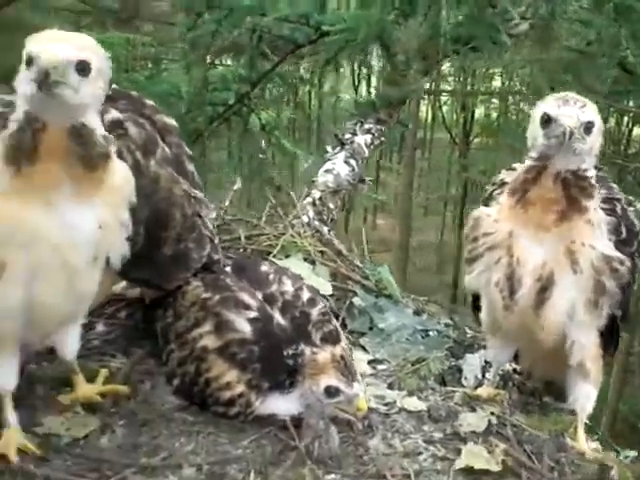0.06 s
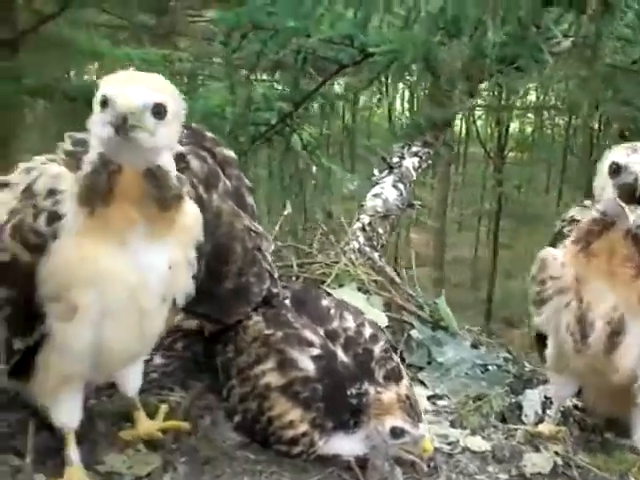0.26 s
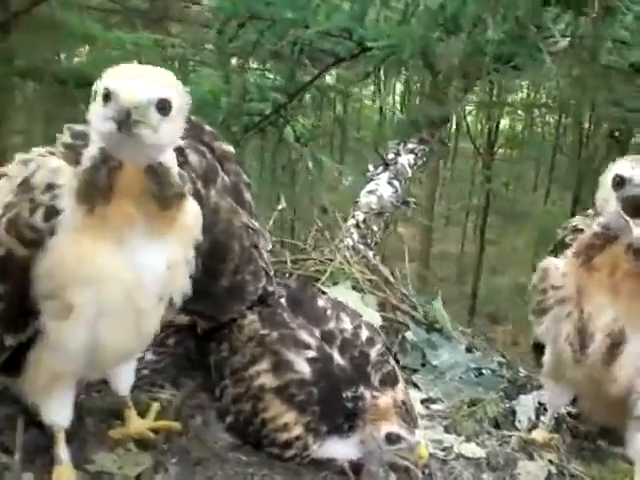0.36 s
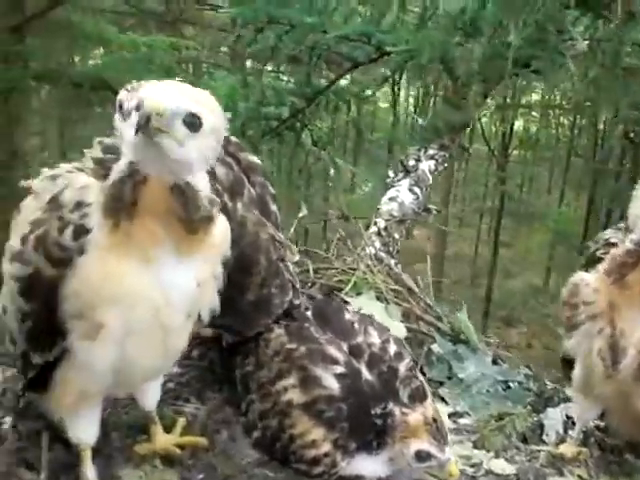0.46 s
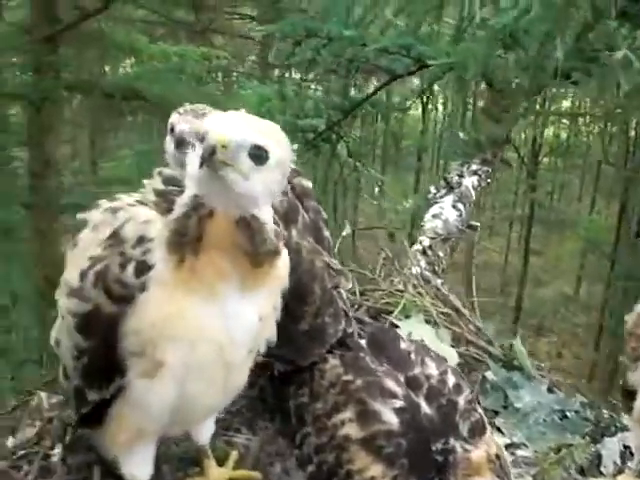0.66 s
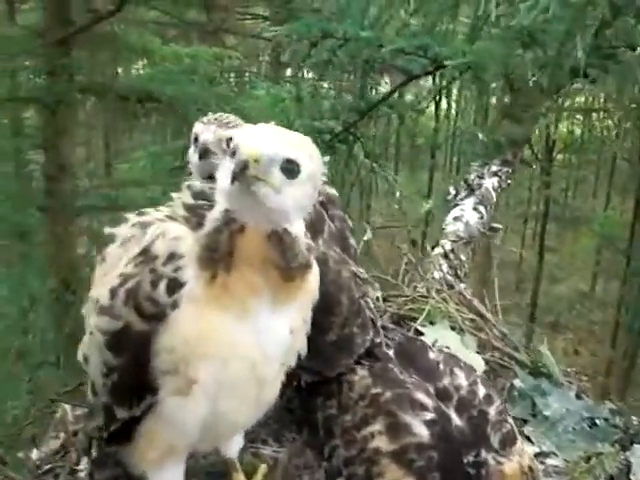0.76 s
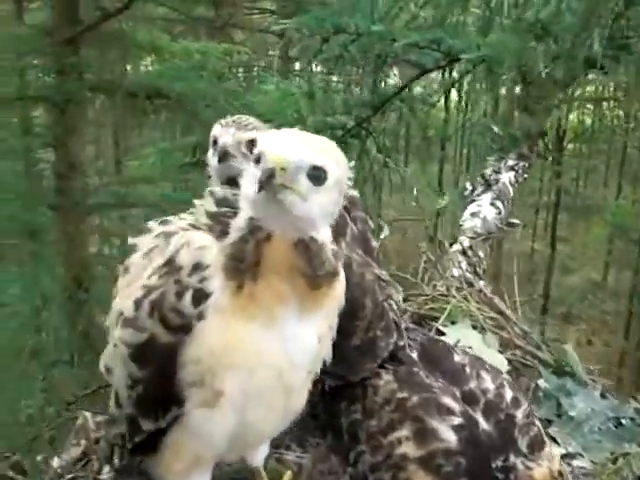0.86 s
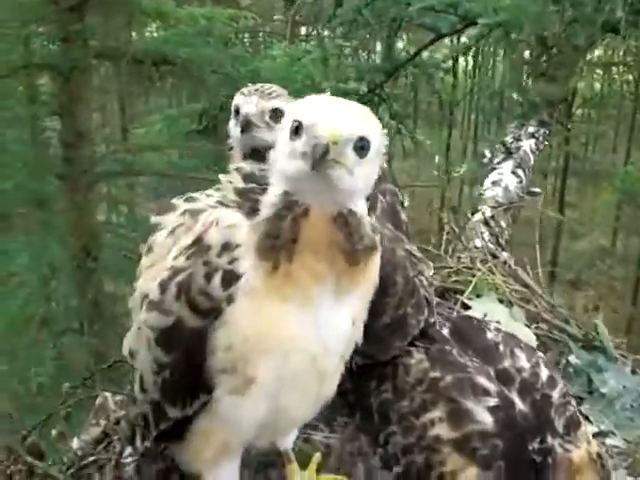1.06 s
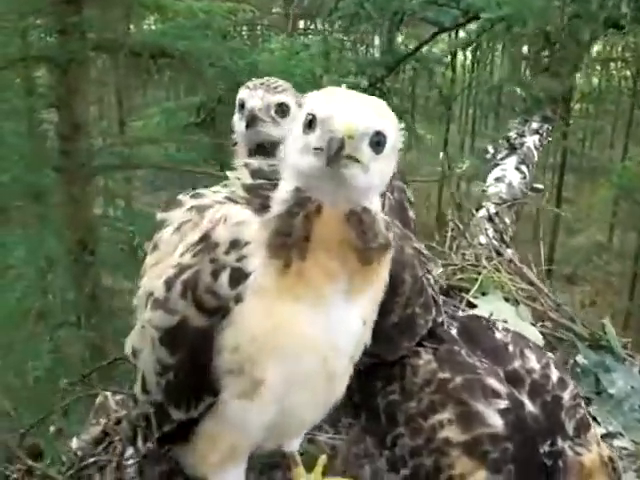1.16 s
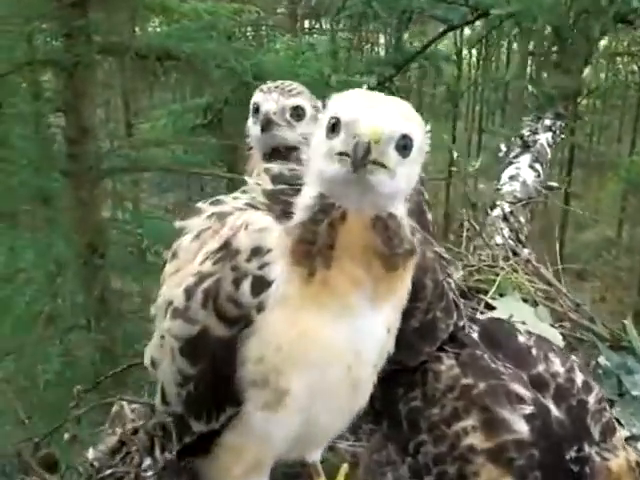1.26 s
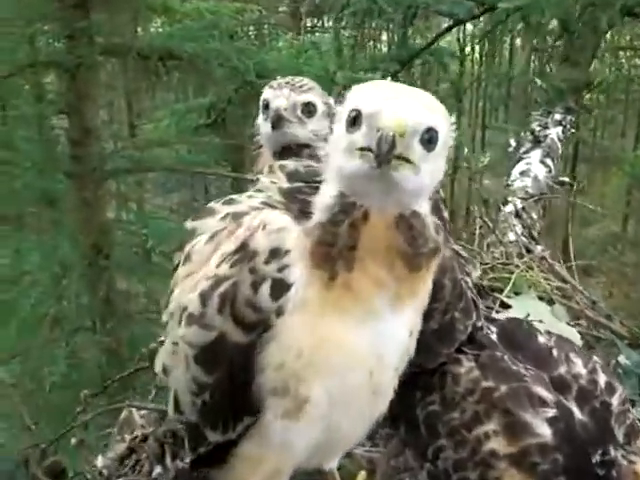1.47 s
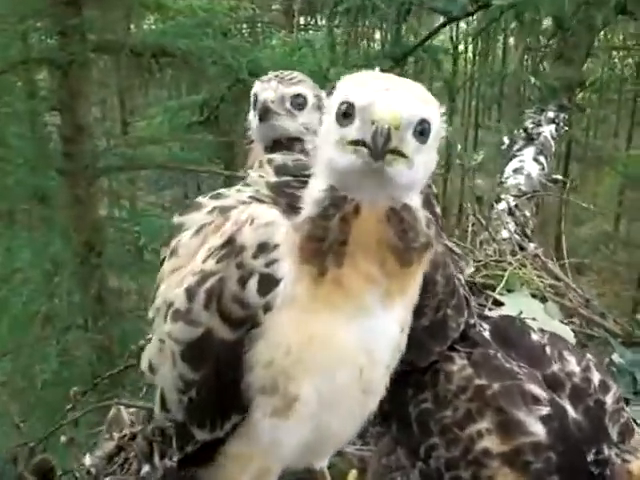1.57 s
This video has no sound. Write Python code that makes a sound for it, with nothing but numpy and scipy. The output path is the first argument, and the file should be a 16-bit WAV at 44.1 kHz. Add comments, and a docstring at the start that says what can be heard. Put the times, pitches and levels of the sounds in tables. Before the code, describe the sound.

A buzzard close by gives a loud whistle that leaps up, falls and breaks into a flutter. The nest rustles softly and a fainter, longer call answers, while small birds chirp in a quiet forest.

```python
"""The forest hushes, air bumps the microphone and small birds chirp, on and off to the end.
At 0.2 s a buzzard close by gives a loud whistle that leaps up, falls and breaks into a flutter
as its voice chokes about a hundred times a second or more. Then the nest rustles, and from 0.8 s
a fainter, longer call answers, hoarse at first and wavering later.
Near the end a twig ticks and feathers brush past."""
import sys
import numpy as np
from scipy import signal
from scipy.fft import rfft, irfft
from scipy.io import wavfile
from scipy.ndimage import uniform_filter1d

SR = 44100
rng = np.random.default_rng(int(sys.argv[2]) if len(sys.argv) > 2 else 0)


def materialize(psi):
    """Save the field psi as 16-bit PCM at rate SR to the path in sys.argv[1].

    A 1-D psi becomes a single channel; in a 2-D psi each row is a channel.
    """
    bounded = np.clip(np.atleast_2d(psi).T, -1, 1)
    quanta = np.round(bounded * 32767).astype(np.int16)
    wavfile.write(sys.argv[1], SR, quanta)


N = 70560
T = np.arange(N) / SR

# how loud the forest's hush is: t/s, level/dB
FOREST_LEVEL = [(0, -53), (.2, -52.5), (.7, -51.5), (1.1, -51.5), (1.3, -52), (1.6, -50.5)]
# the hush's tone colour, mostly low: f/Hz, level/dB
FOREST_COLOUR = [(25, 1.5), (60, 0.5), (130, -1), (250, -4), (600, -10), (1500, -12.5), (3500, -17),
                 (8000, -23), (16000, -28.5)]
# air bumps the microphone: peak t/s, rise/s, fall/s, level/dB
BUMPS = [(0, .01, 0.042, -44), (0.079, 0.013, 0.018, -57), (0.259, 0.034, 0.082, -50),
         (.36, 0.017, 0.016, -40), (0.421, 0.011, 0.017, -40), (.62, 0.18, 0.088, -55),
         (0.882, .01, 0.026, -38.5), (1.475, .012, .03, -39), (1.544, 0.016, 0.05, -39)]
# the deep tone colour of a bump: f/Hz, level/dB
BUMP_COLOUR = [(20, -13), (40, 1), (62, 0), (110, -18.5), (220, -35), (600, -69), (2000, -75)]
# rustles on the nest: peak t/s, rise/s, fall/s, level/dB
RUSTLES = [(0.601, 0.023, 0.17, -51.5), (.715, 0.043, 0.068, -50.5), (.86, 0.21, 0.39, -60),
           (1.02, 0.11, 0.067, -60)]
# the tone colour of a rustle: f/Hz, level/dB
RUSTLE_COLOUR = [(200, -12), (600, 3.5), (1800, -3.5), (3200, 1), (6000, -2), (9000, -7.5), (14000, -8),
                 (16000, -16)]
# the bright tone colour of brushing feathers: f/Hz, level/dB
BRUSH_COLOUR = [(500, -12), (2500, -11), (4300, 3), (7000, 1), (10000, -9.5), (16000, -7.5)]
# twigs tick: t/s, level/dB
TICKS = [(0.786, -53), (1.359, -41)]
# the tone colour of a tick: f/Hz, level/dB
TICK_COLOUR = [(300, 1), (1200, 1), (2500, -6), (6000, -5), (11000, -5), (15000, -2)]
# small birds' chirps, and at the start the fading tail of a distant bird's call, all before leaves blur them:
# start t/s, length/s, first f/Hz, last f/Hz, level/dB
CHIRPS = [(-.07, 0.17, 7420, 7485, -62.5), (-.04, 0.1, 2265, 2186, -57.5),
          (0.103, 0.061, 7400, 5790, -56.5), (.12, 0.23, 2120, 2214, -66), (0.176, 0.07, 5740, 5590, -55),
          (0.484, 0.025, 5400, 4500, -53), (0.495, 0.099, 3900, 4010, -60),
          (0.553, 0.025, 1975, 2020, -48.5), (0.562, 0.028, 5310, 4710, -53),
          (.652, 0.024, 5220, 4490, -54), (.785, .068, 4820, 4650, -51), (0.804, 0.051, 5500, 5000, -56),
          (1.075, .055, 4290, 5450, -53), (1.128, 0.058, 7030, 5920, -55), (1.202, .044, 4283, 5150, -49),
          (1.322, 0.05, 4300, 5140, -51), (1.456, 0.035, 4540, 5160, -47.5),
          (1.491, .08, 3860, 3950, -54.5)]
# the far call's tune: t/s, f/Hz, level/dB
FAR_TUNE = [(.775, 1914, -57), (.795, 2450, -47), (.825, 2762, -51.5), (.865, 2698, -50), (.895, 2467, -64),
            (.935, 2358, -49.5), (1.0, 2219, -50.5), (1.07, 2089, -51.5), (1.16, 1937, -52),
            (1.24, 1952, -54), (1.32, 1929, -59), (1.355, 2002, -55.5), (1.42, 1877, -59),
            (1.465, 2012, -56.5), (1.55, 2040, -56), (1.6, 1907, -54)]
# extra tones in its hoarse start: multiple of a quarter of the pitch, relative level/dB
HOARSE_TONES = [(2, -6), (3, -5), (6, -5.5)]
# the near call's tune: t/s, f/Hz
NEAR_PITCH = [(.217, 2177), (.226, 2367), (.235, 2831), (.248, 2954), (.263, 2907), (.288, 2849),
              (.298, 2562), (.308, 2333), (.338, 2278), (.385, 2181), (.435, 2132), (.47, 2038), (.5, 1995),
              (.537, 1857), (.572, 1664)]
# how loud it is, before the throat shapes it: t/s, level/dB
NEAR_LEVEL = [(.217, -13), (.225, -13.5), (.25, -6.5), (.264, -7), (.281, -10.5), (.296, -14.5),
              (.311, -12), (.324, -13), (.345, -8.5), (.365, -11.5), (.385, -17.5), (.435, -17),
              (.478, -21.5), (.512, -21), (.545, -23.5), (.578, -40)]
# its flutter: t/s, rate/Hz, depth (0 to 1)
FLUTTER = [(.217, 297.7, 0.81), (.234, 326, 0.49), (.252, 376, 0.13), (.263, 354, 0.05),
           (.281, 320.3, 0.13), (.296, 328.7, 0.26), (.308, 293, 0.07), (.382, 103.2, 0), (.388, 103, 0.56),
           (.435, 106.5, 0.62), (.475, 145.8, .42), (.5, 106, 0.63), (.508, 114.3, 0)]
# its voice catches for an instant: t/s, depth (0 to 1)
CATCHES = [(.296, .9), (.304, .9), (.3185, .85), (.3275, .85), (.5195, .9)]
# its overtones, the higher tones above the whistle: multiple of the pitch, relative level/dB
OVERTONES = [(2, 0), (3, -11.5), (4, -20)]
# how strong the overtones are together: t/s, relative level/dB
BRIGHTNESS = [(.217, -26.5), (.238, -17.5), (.256, -35), (.267, -20.5), (.29, -23.5), (.31, -19),
              (.36, -31), (.4, -24.5), (.46, -27), (.51, -30), (.54, -38)]
# the tone colour of a faint hiss that rises and falls with the whistle: f/Hz, level/dB
HISS_COLOUR = [(200, -2), (1000, 5.5), (2500, 2), (4500, 8), (7000, 4), (10000, 4), (16000, 4)]

CHIRP_JITTER, CHIRP_FLICKER_DB = 0.0293, 4.5
FAR_WAVER, FAR_JITTER, FAR_OVERTONE_DB = 0.00605, 0.0094, -22.5
HOARSE_AT_S, HOARSE_WIDTH_S, GRAIN_AT_S, GRAIN_WIDTH_S = 0.853, .035, 1.02, 0.075
FLUTTER_UNEVEN, FLUTTER_SAG, FLUTTER_SWING_HZ = 0.059, .35, 200   # sag and swing at full depth
CHOKE_S, CHOKE_JUMP_HZ = .0011, 120.55
CATCH_S, CATCH_RASP_S, CATCH_JUMP_HZ = 0.0015, 0.00254, 151.5
STRAIN_RANGE_HZ, STEADY_RASP = (2116, 2366), 0.099   # the voice rasps more when pitched high
RASP_BAND_HZ, RASP_FULL_RATE_HZ, RASP_DB, OVERTONE_RASP = (2080, 3040), 343, -9.5, 0.64
PITCH_JITTER, ROUGH_JITTER = 0.00067, 0.014   # shares of the pitch
THROAT_BAND_HZ, ATTACK_S, HISS_DB = (1870, 2963), .004, -31.5
ECHO_DELAY_S, FOREST_FADE_S, LEAF_FADE_S = 0.0086, 1, .2
CUTOFF_HZ = 15900


def from_db(db):
    """Turn decibels into a number to multiply by."""
    return 10 ** (np.asarray(db) / 20)


def unit_power(x):
    """Scale a sound so that its average power is 1."""
    return x / np.sqrt(np.mean(x ** 2) + 1e-20)


def in_time(rows):
    """Join a table's points with straight lines: one curve for each column after the time."""
    times, *columns = np.transpose(rows)
    return [np.interp(T, times, column) for column in columns]


def drift(hz):
    """A random wobble of size about 1, mostly slower than hz."""
    bin_hz = np.arange(N // 2 + 1) * SR / N
    return unit_power(irfft(rfft(rng.standard_normal(N)) / (1 + (bin_hz / hz) ** 2), N))


def noise(colour):
    """Noise of power 1 with the given balance of low and high."""
    hz, db = np.transpose(colour)
    bin_hz = np.maximum(np.arange(N // 2 + 1) * SR / N, 1)
    gain = from_db(np.interp(np.log(bin_hz), np.log(hz), db))
    return unit_power(irfft(rfft(rng.standard_normal(N)) * gain, N))


def band(x, low_hz, high_hz, order=2):
    """Keep what lies between two frequencies."""
    sections = signal.butter(order, [low_hz, high_hz], "band", fs=SR, output="sos")
    return signal.sosfilt(sections, x + 1e-18)


def tone(hz):
    """A pure tone of power 1 that follows a pitch curve."""
    return np.sqrt(2) * np.sin(2 * np.pi * np.cumsum(hz) / SR)


def swell(peak_s, rise_s, fall_s):
    """A rounded rise to 1, then a fade."""
    return np.exp(-np.where(T < peak_s, ((T - peak_s) / rise_s) ** 2, (T - peak_s) / fall_s))


def air():
    """The steady hush of the forest, and low thumps where air bumps the microphone."""
    hush = from_db(in_time(FOREST_LEVEL)[0]) * noise(FOREST_COLOUR)
    bumps = sum(from_db(db) * swell(s, rise, fall) for s, rise, fall, db in BUMPS)
    return hush + bumps * noise(BUMP_COLOUR)


def tree_echo(x, fade_s):
    """Leaves and trunks scatter a sound into a soft echo that drops 60 dB in fade_s."""
    tail = band(rng.standard_normal(N), 500, 8000) * from_db(-60 * T / fade_s) * (T > ECHO_DELAY_S)
    return signal.fftconvolve(x, tail / np.sqrt(np.sum(tail ** 2)))[:N] / 2


def nest():
    """Twigs and feathers rustle, brush and tick: each is a swell of noise."""
    rustle = sum(from_db(db) * swell(s, rise, fall) for s, rise, fall, db in RUSTLES)
    rustle = rustle * noise(RUSTLE_COLOUR)
    brush = from_db(-45.5) * swell(peak_s=1.44, rise_s=0.03, fall_s=0.067) * noise(BRUSH_COLOUR)
    ticks = sum(from_db(db) * swell(s, rise_s=0.00195, fall_s=0.0039) for s, db in TICKS)
    ticks = ticks * noise(TICK_COLOUR)
    grain = from_db(2 * drift(170))
    return (rustle + brush) * grain + ticks


def small_birds():
    """Each chirp is one thin sliding tone; the further it slides, the more it warbles."""
    chirps = np.zeros(N)
    for start, length, first_hz, last_hz, db in CHIRPS:
        progress = np.clip((T - start) / length, 0, 1)
        slide = np.sqrt(abs(np.log2(last_hz / first_hz)))
        hz = (first_hz + (last_hz - first_hz) * progress) * (1 + CHIRP_JITTER * slide * drift(500))
        arch = np.sqrt(np.abs(np.sin(np.pi * progress ** 1.27)))   # peaks just past the middle
        chirps += from_db(db + CHIRP_FLICKER_DB * drift(91)) * arch * tone(hz)
    return chirps


def far_call():
    """The answer starts hoarse, turns grainy as it sinks and ends on a long wavering note."""
    hz, db = in_time(FAR_TUNE)
    hz = hz * (1 + FAR_WAVER * drift(21.7) + FAR_JITTER * drift(317))
    hoarse = sum(from_db(tone_db) * tone(k * hz / 4) for k, tone_db in HOARSE_TONES)
    hoarse = hoarse * np.exp(-((T - HOARSE_AT_S) / HOARSE_WIDTH_S) ** 2 / 2)
    grain = from_db(-5) * drift(120) * tone(hz + 180)   # a flickering tone just above the pitch
    grain = grain * np.exp(-((T - GRAIN_AT_S) / GRAIN_WIDTH_S) ** 2 / 2)
    level = (T > FAR_TUNE[0][0]) * from_db(db - drift(50))   # flickers by about 1 dB
    return level * (tone(hz) + from_db(FAR_OVERTONE_DB) * tone(2 * hz) + hoarse + grain)


def near_buzzard():
    """A raspy whistle with a faint hiss; each flutter starts loud and low, then rises and chokes."""
    (hz,), (db,), (bright_db,) = in_time(NEAR_PITCH), in_time(NEAR_LEVEL), in_time(BRIGHTNESS)
    rate, depth = in_time(FLUTTER)
    start, end = NEAR_LEVEL[0][0], NEAR_LEVEL[-1][0]
    sounding = (T > start) * (T < end)
    # cycle runs from 0 to 1 in each flutter; the voice chokes where two flutters meet
    cycle = np.cumsum(sounding * rate * (1 + FLUTTER_UNEVEN * drift(60))) / SR % 1
    choke = np.exp(-(np.minimum(cycle, 1 - cycle) / rate / CHOKE_S) ** 2)
    catch = sum(amount * np.exp(-((T - s) / CATCH_S) ** 2) for s, amount in CATCHES)
    around_catch = sum(np.exp(-((T - s) / CATCH_RASP_S) ** 2) for s, _ in CATCHES)
    strain = np.interp(hz, STRAIN_RANGE_HZ, (0, 1))
    roughness = depth * (rate / RASP_FULL_RATE_HZ) ** 2 + strain * (around_catch + STEADY_RASP)

    hz = hz * (1 + (PITCH_JITTER + ROUGH_JITTER * roughness) * drift(280))
    hz = hz + depth * (FLUTTER_SWING_HZ * (2 * cycle - 1) + CHOKE_JUMP_HZ * (choke - .3))
    hz = hz + CATCH_JUMP_HZ * (catch + strain * around_catch)

    level = from_db(db) * sounding * np.minimum((T - start) / ATTACK_S, 1)
    openness = 1 - depth * choke
    flutter = uniform_filter1d(openness * (1 - FLUTTER_SAG * depth * cycle), size=16)
    pulsed = level * flutter * (1 - catch)

    rasp = roughness * unit_power(band(rng.standard_normal(N), *RASP_BAND_HZ, order=4))
    whistle = band(pulsed * (tone(hz) + from_db(RASP_DB) * rasp), *THROAT_BAND_HZ, order=4)
    overtones = sum(from_db(tone_db) * tone(k * hz) for k, tone_db in OVERTONES)
    overtones = overtones + OVERTONE_RASP * rasp * tone(hz)
    overtones = overtones * openness * (1 + depth * (1 - 2 * cycle))   # brightest early in each flutter
    overtones = pulsed * from_db(bright_db) * band(overtones, 3500, 14000)
    hiss = level * from_db(HISS_DB) * noise(HISS_COLOUR)
    return whistle + overtones + hiss


def scene():
    """All the birds and their echoes, over nest and air; leaves blur the small birds."""
    near, far, chirps = near_buzzard(), far_call(), small_birds()
    chirps = from_db(-3.5) * chirps + from_db(-7) * tree_echo(chirps, LEAF_FADE_S)
    echo = tree_echo(from_db(-49) * near + from_db(-3.5) * far + from_db(-8) * chirps, FOREST_FADE_S)
    return (near + far + chirps + echo + nest() + air())[None]


def record(dry):
    """Cut away the very highest treble steeply."""
    return signal.sosfilt(signal.ellip(12, .1, 90, CUTOFF_HZ, fs=SR, output="sos"), dry)


dry = scene()
out = record(dry)
materialize(out)
```